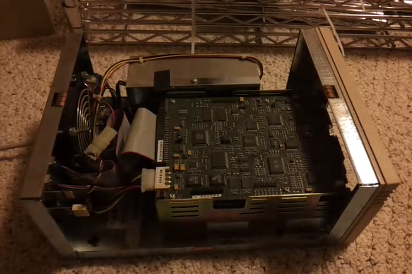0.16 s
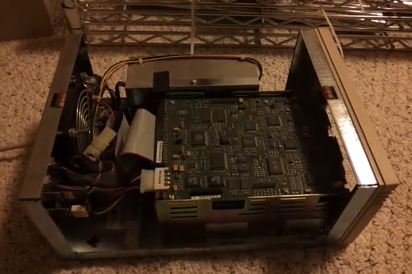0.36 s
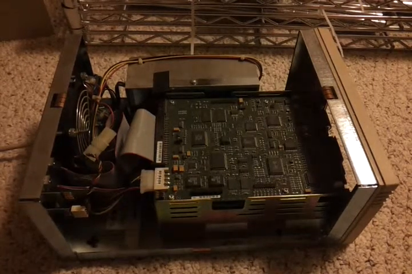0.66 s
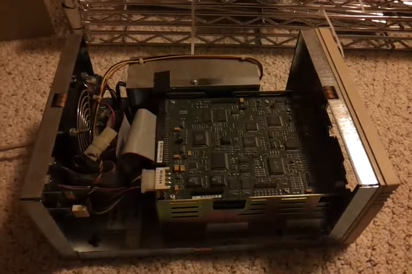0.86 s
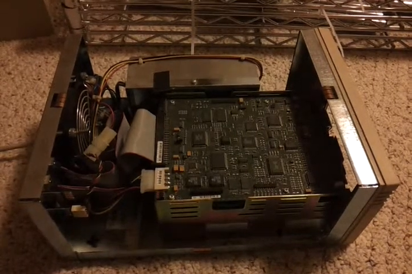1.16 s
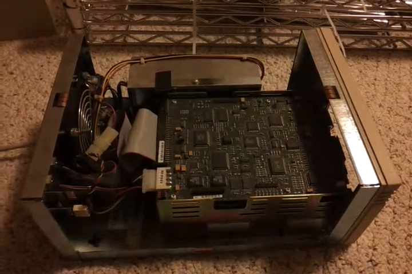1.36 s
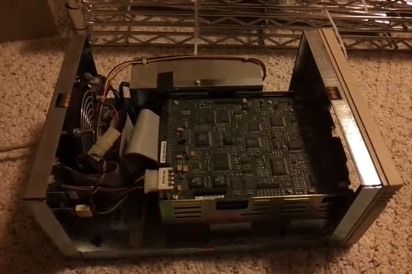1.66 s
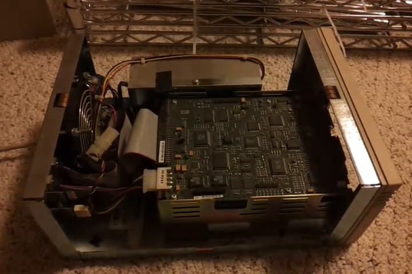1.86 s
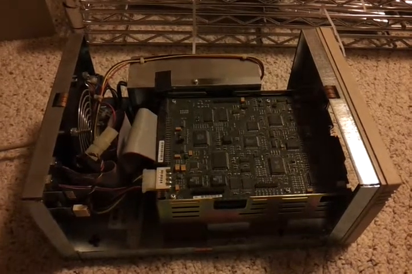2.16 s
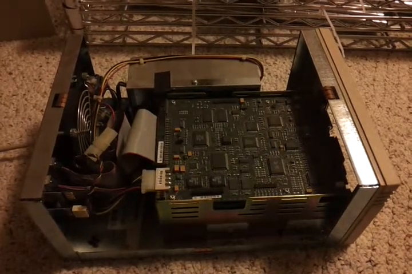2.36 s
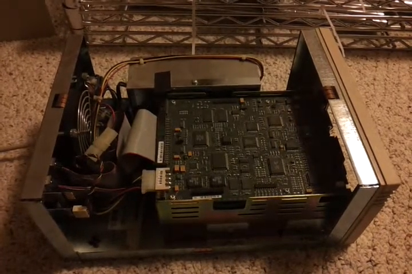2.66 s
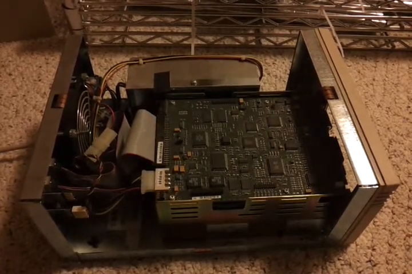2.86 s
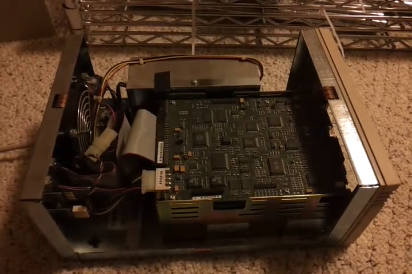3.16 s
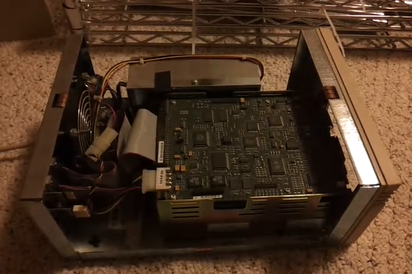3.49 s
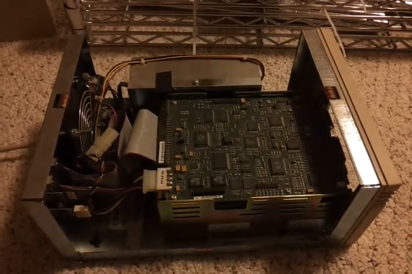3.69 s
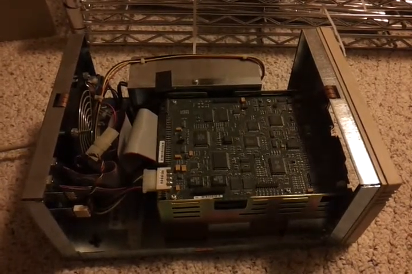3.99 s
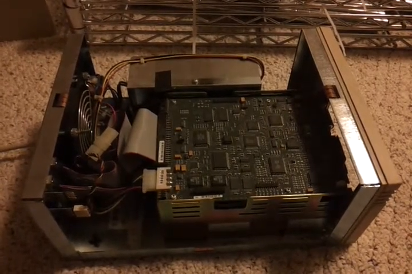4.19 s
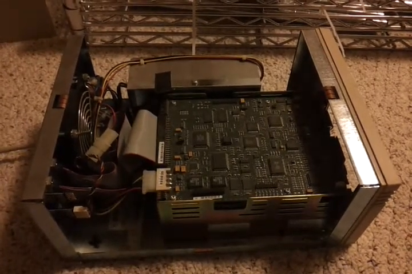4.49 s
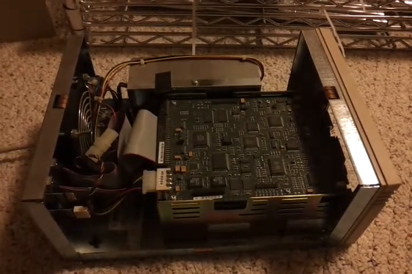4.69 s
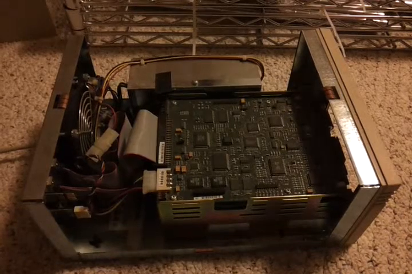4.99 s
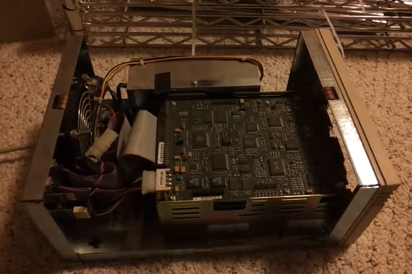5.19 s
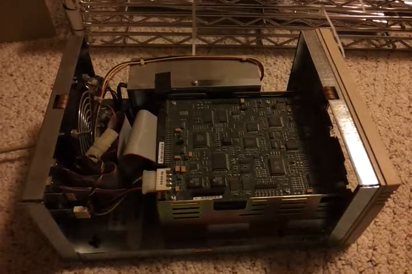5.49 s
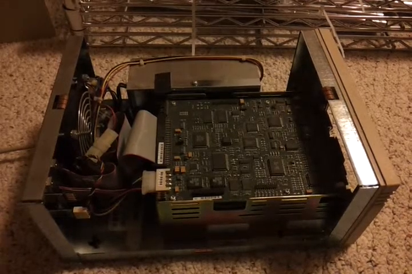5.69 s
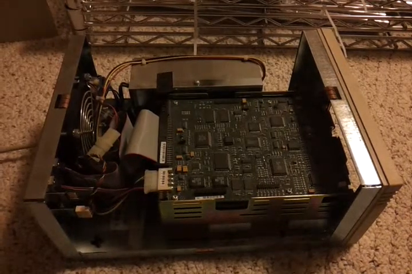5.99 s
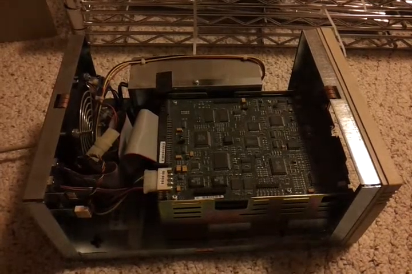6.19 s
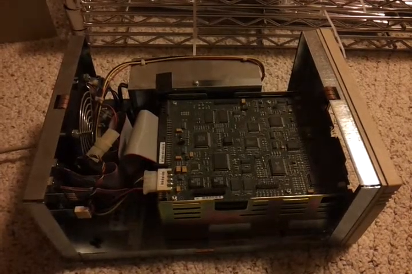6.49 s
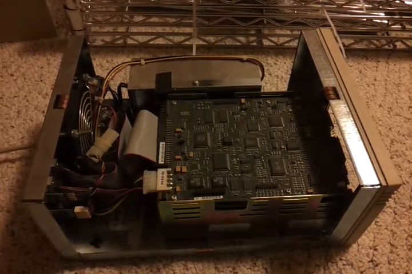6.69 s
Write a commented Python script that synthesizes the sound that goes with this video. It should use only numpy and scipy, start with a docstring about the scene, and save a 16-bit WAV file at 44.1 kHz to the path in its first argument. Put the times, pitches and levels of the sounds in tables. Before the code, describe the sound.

Rising metallic whine and bearing hiss from a hard drive, a sharp click as speed locks, then steady tone with scattered ticks and low fan hum.

```python
"""An old hard drive runs up to full speed: sine tones and noise from its motor and ball bearing climb
through the fixed resonances of its housing, over the hum and moving air of a power-supply fan.
Just after the speed locks, the head latch snaps open: bursts of noise, ringing tones and a short echo.
Then the head arm seeks a few times, heard as ticks of fading noise, while the tones hold steady in pitch.
One microphone with a narrow band hears it all, so both channels are alike."""
import sys
import numpy as np
from scipy.fft import rfft, irfft, next_fast_len
from scipy.io import wavfile
from scipy.ndimage import map_coordinates

SR = 44100
rng = np.random.default_rng(int(sys.argv[2]) if len(sys.argv) > 2 else 0)


def generate_wav(sig):
    """Save sig (samples, or channels by samples) to the path in sys.argv[1] as 16-bit PCM at SR."""
    pcm = np.round(np.clip(np.atleast_2d(sig).T, -1, 1) * 32767).astype(np.int16)
    wavfile.write(sys.argv[1], SR, pcm)


N = 302085  # length in samples


def amp(db):
    """Turn decibels into a plain factor."""
    return 10 ** (np.asarray(db) / 20)


def unit(x):
    """Scale a sound to an rms level of 1."""
    return x / np.sqrt(np.mean(x ** 2) + 1e-20)


def along(points, hz):
    """Read a curve of (Hz, value) points, joined by straight lines on a log frequency axis."""
    point_hz, values = np.transpose(points)
    return np.interp(np.log(hz + 1), np.log(np.sort(point_hz)), values)


def wobble(rate, samples=np.arange(N)):
    """A smooth random curve at the given samples, with `rate` random knots a second."""
    knots = rng.standard_normal(size=512)
    return map_coordinates(knots, [samples * rate / SR], mode="mirror")


def filtered(x, response):
    """Multiply the spectrum of x by a response that depends on frequency."""
    padded = next_fast_len(len(x) + 8192, True)  # silence at the end gives the filter room to ring
    hz = np.fft.rfftfreq(padded, 1 / SR)
    return irfft(rfft(x, padded) * response(hz), padded)[:len(x)]


def coloured(x, spectrum):
    """Shape x with a (Hz, dB) spectrum, then scale it to an rms level of 1."""
    return unit(filtered(x, lambda hz: amp(along(spectrum, hz))))


def noise(samples, spectrum):
    """Random hiss with the given spectrum, at an rms level of 1."""
    return coloured(rng.standard_normal(samples), spectrum)


def add(track, s, sound):
    """Mix a sound into the track, starting at s seconds."""
    start = round(s * SR)
    track[start:start + len(sound)] += sound[:N - start]


# Colour of the fan's and the room's air noise.
# Each row: frequency in Hz, relative level in dB per Hz.
AIR_COLOUR = [(10, 7.5), (25, 0.5), (55, 3.5), (90, 2), (120, 3), (170, -2), (260, -2.5), (450, -8),
              (800, -8), (1800, -9), (5000, -41.5), (9000, -16.5)]
FAN_HZ, FAN_DB = 76.4, -60.0  # pitch of the hum, and the rms level it wavers around


def fan():
    """A low hum, slightly unsteady in pitch and level, over the steady noise of moving air."""
    phase = 2 * np.pi * FAN_HZ * np.arange(N) / SR + 0.18 * wobble(rate=4.3)
    level = amp(FAN_DB + 1.3 * wobble(rate=1.9))
    hum = np.sqrt(2) * level * np.sin(phase)
    return hum + amp(-57.0) * noise(N, AIR_COLOUR)


# The ticks of the head arm as it starts, brakes and rebounds.
# Each row: start in seconds, level in dB, time to fade by 60 dB in seconds.
ARM_TICKS = [(4.371, -42, .04), (4.961, -39.5, 0.058), (5.2125, -36.5, 0.12), (5.229, -33.5, 0.026),
             (5.2346, -37, 0.027), (5.633, -41.5, 0.076), (5.656, -51, 0.11), (6.5706, -35, 0.082),
             (6.5881, -30, 0.046)]
# Colour of a tick. Each row: frequency in Hz, relative level in dB per Hz.
ARM_COLOUR = [(100, -18.5), (250, -11.5), (500, -31.5), (1100, -12.5), (1500, -17), (1700, 3.5), (1900, -7),
              (2150, 5.5), (2500, -10.5), (2800, -7.5), (3800, -35), (4900, -10.5), (6000, -24),
              (8500, -13)]


def seeks():
    """Each kick of the voice coil makes the head arm tick: a burst of noise that fades away."""
    out = np.zeros(N)
    t = np.arange(SR // 4) / SR
    for s, db, t60 in ARM_TICKS:
        onset = 1 - np.exp(-t / 0.0005)
        fade = amp(db - 60 * t / t60)
        add(out, s, fade * onset * noise(len(t), ARM_COLOUR))
    return out


# Contacts of the head latch with its stop.
# Each row: start in seconds, level in dB, brightness in dB per octave.
LATCH_CONTACTS = [(3.8811, -20.5, 1.5), (3.8819, -22, -1.5), (3.885, -16.5, 0.5), (3.8909, -37, 2)]
# Ringing tones of the latch and the cover.
# Each row: frequency in Hz, relative level in dB, time to fade by 60 dB in seconds.
COVER_RING = [(1090, -20.5, .08), (1340, -10.5, 0.12), (1690, -17, 0.067), (2555, -7.5, .08),
              (2900, -9, 0.043), (3980, -22, .04), (4524, -8, 0.033), (4782, -12, .04), (5280, -10, 0.059),
              (5420, -16, 0.045), (5825, -17, 0.081), (6810, -20, 0.059)]
# Colour of the crack. Each row: frequency in Hz, relative level in dB per Hz.
CRACK_COLOUR = [(300, -28), (800, -60), (1200, -4.5), (2100, -9.5), (2800, -3), (3800, -12), (4700, 1.5),
                (5500, -1.5), (6300, -16), (7500, -12), (9000, -22.5)]
# Colour of the case's answer. Each row: frequency in Hz, relative level in dB per Hz.
CASE_ECHO = [(300, -27), (1200, -3.5), (2600, -4.5), (4000, -1), (5400, 2), (6300, -11), (9000, -7)]


def latch(ring_db, crack_t60, echo_db, echo_t60):
    """The latch slaps its stop in a quick chatter; the cover rings and the case answers."""
    out = np.zeros(N)
    t = np.arange(SR // 3) / SR
    onset = 1 - np.exp(-t / 0.00083)
    for s, db, bright_db in LATCH_CONTACTS:
        def tilt(hz):
            """A brighter contact has more treble and less bass, balanced around 3500 Hz."""
            return amp(bright_db * np.log2(np.clip(hz, 500, 6000) / 3500))

        ring = np.zeros(len(t))
        for hz, level_db, t60 in COVER_RING:
            tone = np.sin(2 * np.pi * (hz * t + rng.random()))
            ring += tilt(hz) * amp(level_db - 60 * t / t60) * tone
        crack = amp(-60 * t / crack_t60) * unit(filtered(noise(len(t), CRACK_COLOUR), tilt))
        echo = amp(echo_db - 60 * t / echo_t60) * noise(len(t), CASE_ECHO)
        add(out, s, amp(db) * (crack + amp(ring_db) * ring + echo) * onset)
    return out


# The spindle gathers speed ever more slowly, then locks.
LOCK_S = 3.855  # seconds
GAIN_PER_S, TAPER_PER_S2 = .0395, .00264  # share of full speed gained per s at the lock; fall of it per s
RELEASE_S = 0.026  # seconds the starting current takes to die away after the lock
# Bearing rush: dB under starting current, dB gained per s of run-up, dB lost per s at full speed
PULL_DB, BUILD_DB_PER_S, SETTLE_DB_PER_S = 5, 0.54, 0.3


def run_up():
    """Speed (share of full), share of starting current and effort (dB), one value per sample."""
    t = np.arange(N) / SR
    before = np.maximum(LOCK_S - t, 0)
    after = np.maximum(t - LOCK_S, 0)
    speed = 1 - GAIN_PER_S * before - TAPER_PER_S2 * before ** 2 / 2
    current = np.clip(1 - after / RELEASE_S, 0, 1)
    effort_db = PULL_DB * current - BUILD_DB_PER_S * before - SETTLE_DB_PER_S * after
    return speed, current, effort_db


# Resonances of the drive's housing.
# Each row: frequency in Hz, width in Hz, strength in dB.
HOUSING_MODES = [(216.3, 13.9, 10.5), (377, 28, 9), (637.5, 5.6, 3), (1094, 90, 9.5), (1245, 190, 8.5),
                 (1636, 71, 10.5), (1910, 180, 9.5), (1960.4, 62, 16), (2075, 20, 7.5), (2355, 89, 4),
                 (2699, 160, 6), (2985, 160, 6.5), (3290, 66, 10.5), (3446, 104, 21), (3552, 203, 13),
                 (3676, 260, 10), (4270, 480, 4.5), (4445, 83, 12.5), (4680, 186, 19), (5000, 360, 9),
                 (5386, 168, 10.5), (6490, 320, 11), (6960, 446, 14)]


def housing(hz):
    """Gain of the housing: a partial swells as it climbs through a resonance."""
    power = 1
    for centre, width, db in HOUSING_MODES:
        power = power + amp(db) ** 2 / (1 + (2 * (hz - centre) / width) ** 2) ** 2
    return np.sqrt(power)


SCATTER_DB, HIGHEST_HZ = 2.5, 7700  # lesser harmonics: scatter of level; limit before any sideband shift


def series(rate, shift, lesser_db, start_db, strong):
    """One row of harmonics: Hz at full speed, dB before the housing, extra dB under starting current."""
    for k in range(1, int(HIGHEST_HZ / rate) + 1):
        db = strong.get(k, lesser_db + rng.normal(0, SCATTER_DB))
        yield k * rate + shift, db, start_db


# Harmonics that stand out, for the motor, a flaw in the fixed race, one in the turning race,
# a flaw on a ball, and that ball's sidebands above and below.
# Each entry: harmonic number, rms level in dB before the housing and without starting current.
MOTOR = {4: -73, 5: -86, 6: -81, 8: -68.5, 9: -75, 10: -74, 11: -84, 12: -70.5, 14: -74.5, 16: -79.5, 17:
         -76, 18: -82, 20: -88, 21: -79.5}
FIXED_RACE = {1: -81.5, 2: -75, 3: -75.5, 4: -73.5, 5: -69, 6: -67.5, 7: -69, 8: -70, 9: -74, 13: -82, 15:
              -80, 17: -80.5}
TURNING_RACE = {1: -70, 3: -69, 4: -78.5, 5: -70.5, 6: -69, 7: -78.5, 8: -71.5, 9: -69.5, 10: -72, 13: -80,
                15: -64.5, 31: -82.5}
BALL = {3: -76.5, 4: -68.5, 5: -70, 6: -69.5, 7: -66, 8: -68.5, 9: -73, 10: -71.5, 15: -76.5, 16: -77}
BALL_ABOVE = {2: -74, 4: -80, 5: -70, 9: -77, 11: -81, 12: -74, 13: -72.5, 14: -69.5, 15: -74, 16: -76, 17:
              -78.5, 18: -74.5, 19: -74, 20: -82.5, 22: -85}
BALL_BELOW = {6: -69, 7: -75.5, 9: -74, 10: -74.5, 11: -76.5, 12: -68.5, 13: -76, 14: -70, 16: -76, 17:
              -77.5, 18: -75, 19: -79, 20: -79.5}
# At full speed: spindle turns per s, cage turns per s, contacts of a ball's flaw per s
SPINDLE_HZ, CAGE_HZ, BALL_HZ = 90.03, 56.59, 318.25
BALLS, PHASES = 7, 3  # balls in the bearing, phases of the motor


def partials():
    """Every harmonic of the motor and the ball bearing, in the form that series() gives."""
    # the motor's magnetic pull
    yield from series(PHASES * SPINDLE_HZ, 0, lesser_db=-92.5, start_db=7.1, strong=MOTOR)
    # balls cross a flaw in the fixed race, and one in the turning race
    yield from series(BALLS * CAGE_HZ, 0, lesser_db=-87, start_db=2.5, strong=FIXED_RACE)
    yield from series(BALLS * (SPINDLE_HZ - CAGE_HZ), 0, lesser_db=-92, start_db=-2.1, strong=TURNING_RACE)
    # a flaw on a spinning ball; the cage carries the ball round, which adds sidebands above and below
    yield from series(BALL_HZ, 0, lesser_db=-88, start_db=-1.6, strong=BALL)
    yield from series(BALL_HZ, CAGE_HZ, lesser_db=-88, start_db=0.33, strong=BALL_ABOVE)
    yield from series(BALL_HZ, -CAGE_HZ, lesser_db=-85, start_db=1.3, strong=BALL_BELOW)


def whine(turned, current, waver_db, drift_db):
    """Partials locked to the spindle, each wavering and drifting as the balls shift in their races."""
    out = np.zeros(N)
    step = 64  # levels are worked out once per 64 samples
    ticks = np.arange(0, N, step)
    for hz, db, start_db in partials():
        unsteady_db = waver_db * wobble(8.1, ticks) + drift_db * wobble(1.1, ticks)
        gain_db = db + start_db * current[ticks] + unsteady_db
        cycles = hz * turned + rng.random()
        phase = 2 * np.pi * (cycles - np.floor(cycles)).astype(np.float32)
        out += np.repeat(amp(gain_db), step)[:N] * np.sin(phase)
    return np.sqrt(2) * out


def races(turned, count):
    """Tiny flaws in the races come round again and again: faint partials that rise with the speed."""
    spectrum = np.zeros(N, complex)
    where, size, angle = rng.random((count, 3)).T
    bins = (where * N / 2).astype(int)
    spectrum[bins] = np.sqrt(-np.log(size)) * np.exp(2j * np.pi * angle)
    at_full_speed = irfft(spectrum)
    return map_coordinates(at_full_speed, [turned * SR], order=3)  # played at the spindle's pace


# Colour of the rolling noise before the housing.
# Each row: frequency in Hz, relative level in dB per Hz.
ROLLING_COLOUR = [(100, -28.5), (500, -10), (1000, -13.5), (1400, -7.5), (1950, 1), (2400, -4),
                  (3000, -0.5), (3450, 1.5), (4100, 2), (4700, -2.5), (5200, -5.5), (6000, -6),
                  (7000, -7.5), (9000, -4.5)]


def spindle():
    """Whine and rolling noise of the motor and bearing, radiated by the housing."""
    speed, current, effort_db = run_up()
    turned = np.cumsum(speed) / SR  # rotation, in seconds at full speed
    rush = amp(effort_db - 60.5 + 0.47 * wobble(rate=7)) * noise(N, ROLLING_COLOUR)
    thicket = amp(0.45 * effort_db - 58.0) * coloured(races(turned, count=900), ROLLING_COLOUR)
    # rolling is spread over the races, so it picks out the resonances less sharply
    rolling = filtered(rush + thicket, lambda hz: housing(hz) ** 0.76)
    tones = whine(turned, current, waver_db=0.73, drift_db=1.32)  # quick waver, slow drift
    return rolling + filtered(tones, housing)


def scene():
    """Drive and fan reach both channels alike."""
    click = latch(ring_db=-6, crack_t60=0.018, echo_db=-22.0, echo_t60=0.27)  # t60 in seconds
    mono = fan() + seeks() + click + spindle()
    return np.array([mono, mono])


# Response of the microphone. Each row: frequency in Hz, gain in dB.
MICROPHONE_RESPONSE = [(10, 0), (7200, 0), (7650, -8), (8000, -31), (8350, -19), (8800, -22), (9200, -36)]
TOP_HZ = 9150  # nothing passes from here up


def record(dry):
    """The microphone's narrow band, with a notch near its upper edge."""
    def response(hz):
        return amp(along(MICROPHONE_RESPONSE, hz)) * (hz < TOP_HZ)

    return np.array([filtered(side, response) for side in dry])


dry = scene()
out = record(dry)
generate_wav(out)
```